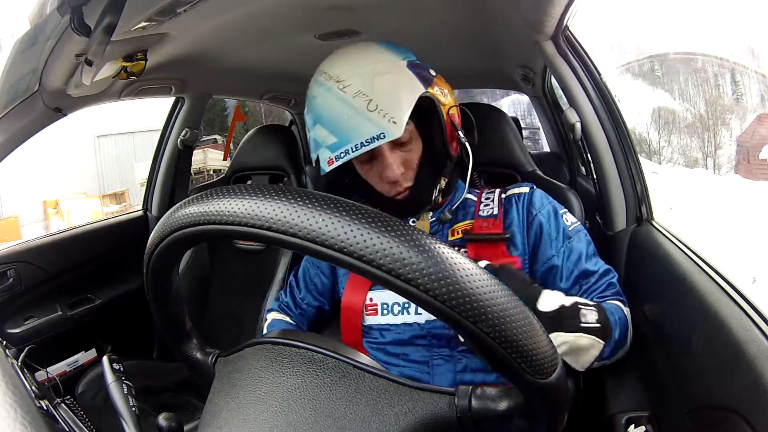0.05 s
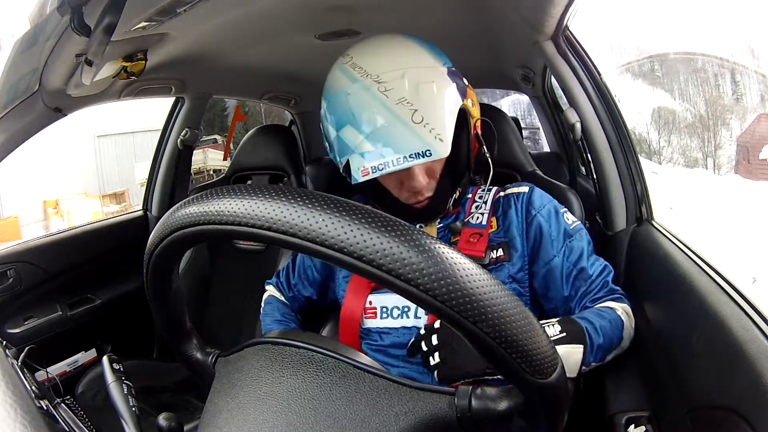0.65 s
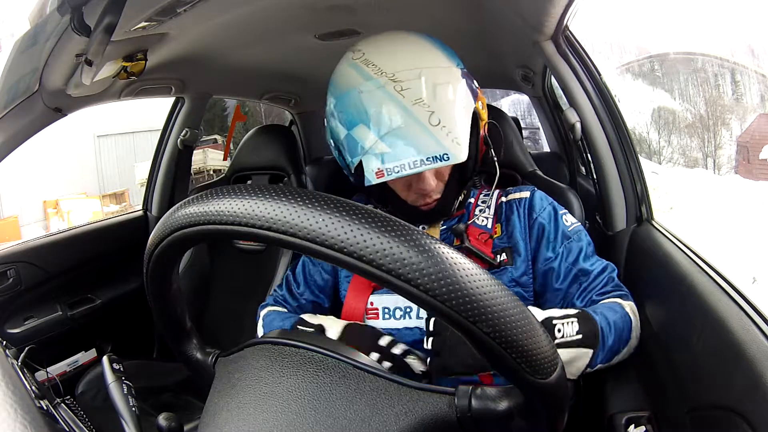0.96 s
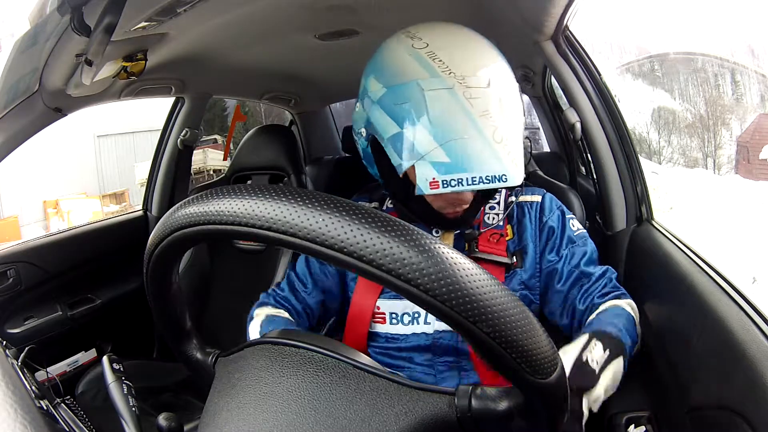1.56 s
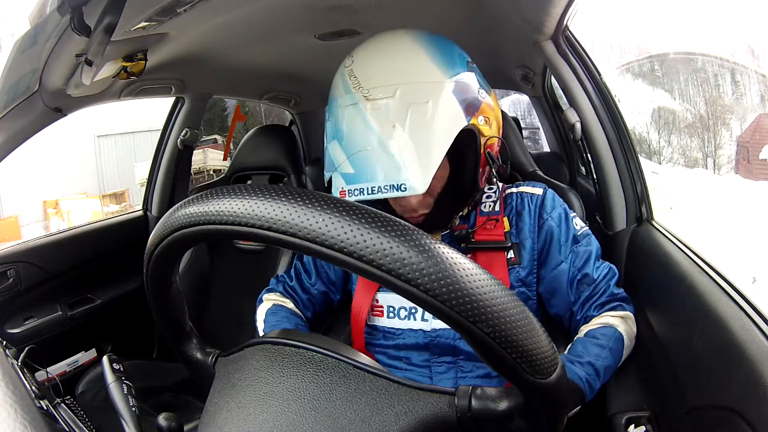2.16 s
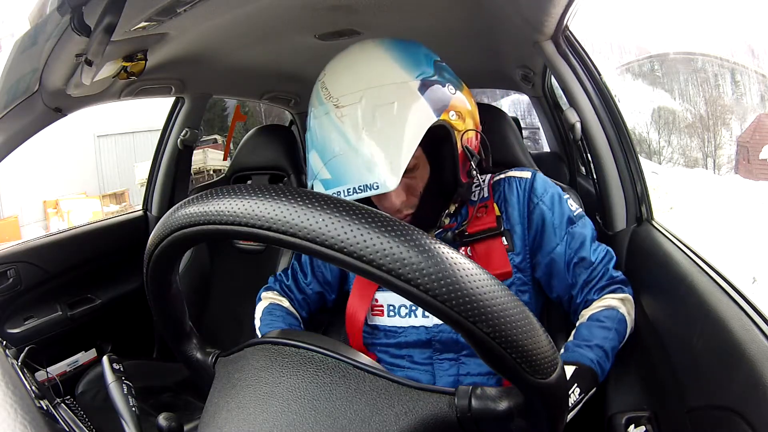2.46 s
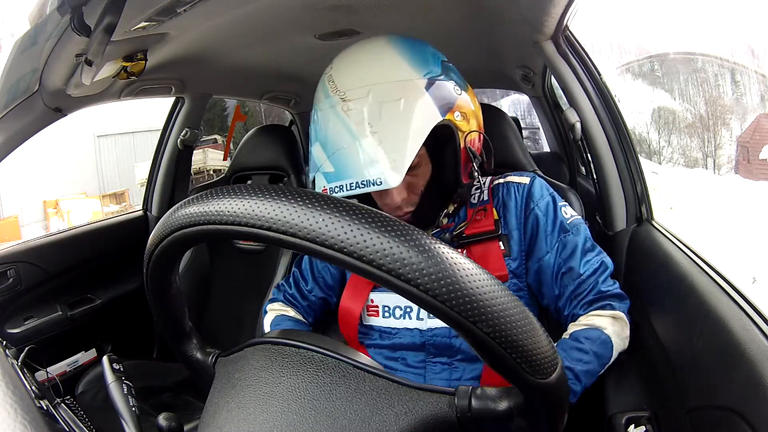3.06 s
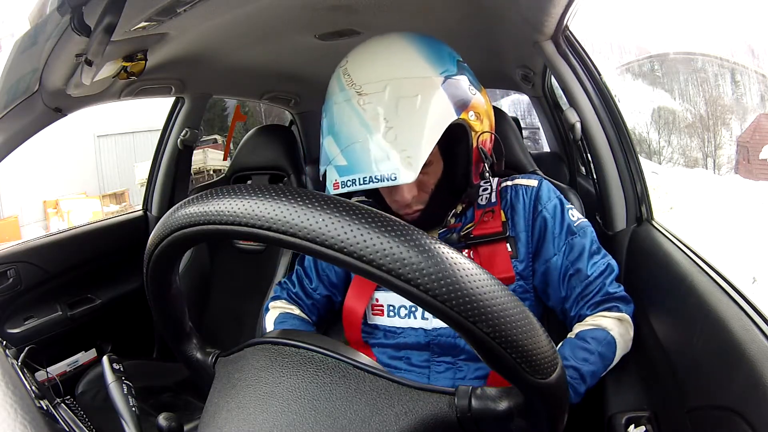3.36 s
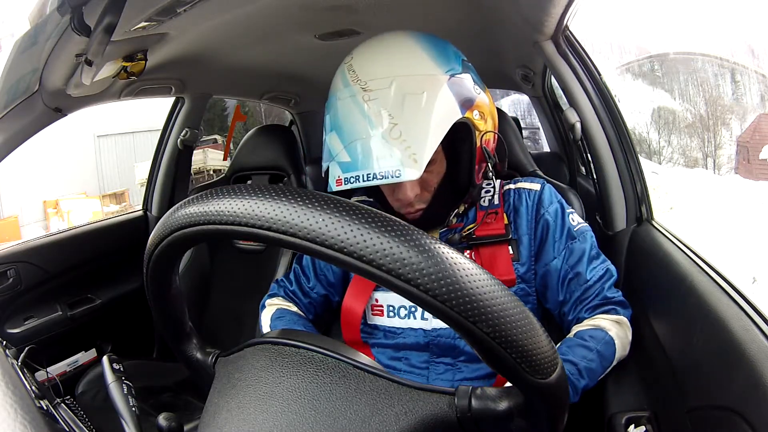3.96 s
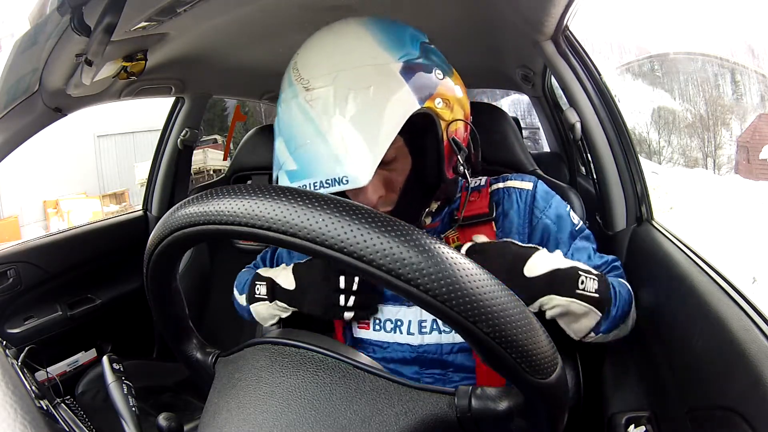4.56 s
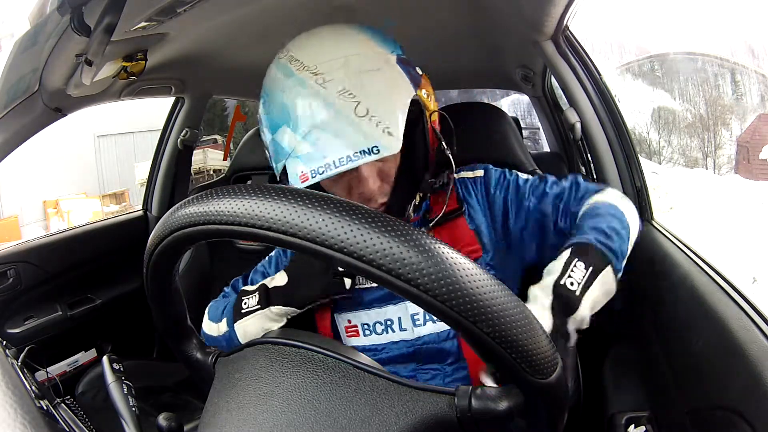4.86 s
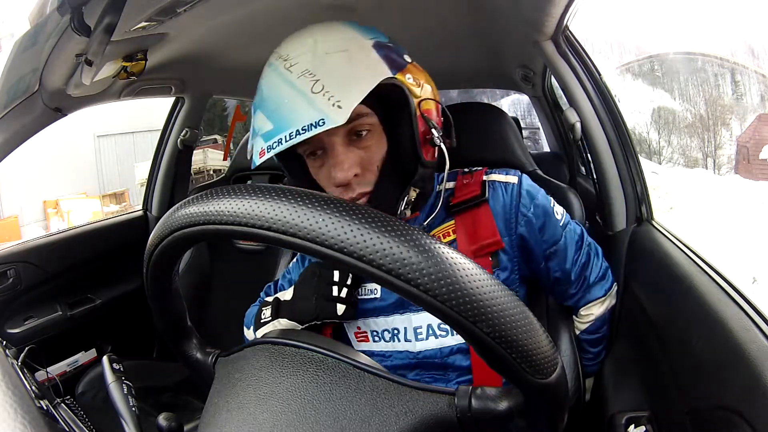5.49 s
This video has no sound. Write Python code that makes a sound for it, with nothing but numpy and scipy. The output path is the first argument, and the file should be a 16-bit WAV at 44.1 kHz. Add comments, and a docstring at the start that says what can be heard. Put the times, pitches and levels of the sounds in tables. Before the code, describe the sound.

A four-cylinder car engine idles steadily for the whole of nearly six seconds, heard inside the closed cabin as a low, pulsing boom with a soft mechanical wash and a very faint, thin, high whine. Close to the microphone, the driver's suit rustles in short swishes, and gloves and straps knock dully on the seat, around 0.2 to 0.5 seconds and again at 1.4 and 1.8. From about 1.4 seconds, metal harness tongues tick, jingle and scrape lightly at the buckle. The rustling eases after 3.3 seconds. A sharper metallic click comes at 3.9, and at 4.1 the buckle snaps home with the loudest click and a low clunk, followed by a few smaller ticks. The fabric rustles again from 4.3 to 5.4 seconds. At 5.1 an elbow hits the door with a hollow thump, then a softer bump, while the idle carries on.

```python
"""Inside the closed cabin of a four-cylinder rally car at idle, one microphone in with the driver.
Exhaust pulses make the cabin boom, the engine's wash comes through the bulkhead, and a thin electronic
whine sits on top. Close by, the driver's suit rustles as he gathers the harness, gloves and webbing
knock on the seat and an elbow bumps the door. In the foreground the harness's metal tongues tick and
scrape at the buckle, setting it ringing, and snap home with a low clunk of the latch."""
import sys
import numpy as np
from scipy import signal
from scipy.fft import rfft, irfft
from scipy.io import wavfile
from scipy.ndimage import uniform_filter1d

SR = 44100
rng = np.random.default_rng(int(sys.argv[2]) if len(sys.argv) > 2 else 0)


def log_audio(samples):
    """Write samples as a 16-bit WAV file to the path given in sys.argv[1]."""
    # one column per channel
    frames = np.atleast_2d(samples).T
    # limit to full scale, then quantise
    limited = np.clip(frames, -1, 1)
    pcm = np.round(limited * 32767).astype(np.int16)
    wavfile.write(sys.argv[1], SR, pcm)


N = 252674
TIME = np.arange(N) / SR


def from_db(db):
    """Decibels to gain."""
    return 10 ** (np.asarray(db) / 20)


def unit_rms(x):
    """Scale to an rms of 1."""
    return x / np.sqrt(np.mean(x ** 2) + 1e-20)


def curve(rows, t):
    """Join (time, value) rows by straight lines."""
    return np.interp(t, *np.transpose(rows))


def butter(x, hz, kind, order=2):
    """Butterworth filter."""
    return signal.sosfilt(signal.butter(order, hz, kind, fs=SR, output="sos"), x)


def drift(per_s):
    """A random wander of rms 1 that takes a new value per_s times a second."""
    points = np.c_[np.arange(4000) / per_s, rng.standard_normal(4000)]
    return unit_rms(curve(points, TIME))


def coloured(white, spectrum):
    """Shape white sound to (frequency, level) rows; rms 1."""
    hz, db = np.transpose(spectrum)
    bin_hz = np.maximum(np.arange(N // 2 + 1) * SR / N, 1)
    gain = from_db(np.interp(np.log(bin_hz), np.log(hz), db))
    return unit_rms(irfft(rfft(white) * gain, N))


def resonate(x, hz, width_hz):
    """One resonance with gain 1 at its peak."""
    radius = np.exp(-np.pi * width_hz / SR)
    feedback = [1, -2 * radius * np.cos(2 * np.pi * hz / SR), radius ** 2]
    return signal.lfilter(np.array([1, 0, -1]) * (1 - radius ** 2) / 2, feedback, x + 1e-18)


def struck(modes, scatter_db=0):
    """A body's ring after one sharp blow; scatter favours some modes, as the striking point does."""
    blow = signal.unit_impulse(SR // 4)
    return sum((-1) ** k * from_db(db + scatter_db * rng.standard_normal()) * resonate(blow, hz, width)
               for k, (hz, width, db) in enumerate(modes))


def through(x, ring):
    """Pass a sound through a body, keeping its energy."""
    rung = signal.oaconvolve(x, ring)[:len(x)]
    return rung * np.linalg.norm(x) / (np.linalg.norm(rung) + 1e-20)


def contact(decay_s, tail_db, tail_s):
    """A touch and its dense cabin reflections: a noise burst with a fainter tail."""
    t = TIME[:SR // 4]
    return rng.standard_normal(len(t)) * (np.exp(-t / decay_s) + from_db(tail_db) * np.exp(-t / tail_s))


def add(track, at_s, sound):
    """Mix a sound into the track, starting at at_s."""
    start = int(np.clip(at_s * SR, 0, N - 1))
    track[start:start + len(sound)] += sound[:N - start]


def whine(hz=10519, rms_db=-73.5):
    """Electronics, far in the background: one thin, steady tone."""
    return from_db(rms_db) * np.sqrt(2) * np.sin(2 * np.pi * hz * TIME)


# The engine's idle speed: (time [s], firing rate [Hz])
FIRING_RATE = [(0.0, 27.27), (0.7, 27.247), (1.35, 27.161), (1.6, 27.04), (2.3, 27.208), (3.2, 27.225),
               (3.85, 26.97), (4.15, 27.606), (4.4, 27.298), (4.6, 27.508), (5.3, 27.411), (5.73, 27.457)]
# Exhaust and cabin resonances: (frequency [Hz], width [Hz], level [dB])
BOOM_MODES = [(50.4, 8.0, -27.7), (65.0, 58.4, -30.6), (100.0, 81.8, -33.8), (181.3, 31.4, -40.9)]
def exhaust(uneven=0.037, limp=0.12, muffler_hz=243.4, leak_hz=41.8, nominal_hz=27.31, db_per_hz=2.3):
    """One pulse per firing booms in the cabin. Returns the boom and the firing phase in cycles."""
    rate = curve(FIRING_RATE, np.arange(-SR, N) / SR)  # a second's lead lets the boom build
    phase = np.cumsum(rate) / SR
    phase = phase - phase[SR] - .21  # the first firing falls .21 cycles in
    firings = np.flatnonzero(np.diff(np.floor(phase)))
    strong_weak = (-1.) ** np.arange(len(firings))
    boom = 0
    for k, (hz, width, db) in enumerate(BOOM_MODES):
        # the higher modes feel the cylinders' unevenness most
        scatter = (uneven * rng.standard_normal(len(firings)) + limp * strong_weak) * hz / muffler_hz
        pulses = np.zeros(len(rate))
        pulses[firings] = (1 + scatter) * SR / rate[firings]
        boom = boom + (-1) ** k * from_db(db) * resonate(pulses, hz, width)
    boom = butter(boom, muffler_hz, "low", order=8)
    boom = butter(boom, leak_hz, "high", order=4)  # the deepest swings leak out of the cabin
    swell = from_db(0.5 + db_per_hz * (rate - nominal_hz))  # louder when the idle runs fast
    return (boom * swell)[SR:], phase[SR:]


# Mechanical wash from beyond the bulkhead: (frequency [Hz], spectral level [dB])
WASH_SPECTRUM = [(20, 2), (30, 7.5), (100, 6.5), (190, 9), (270, -3), (430, -6.5), (520, -3), (800, -15.5),
                 (1400, -16.5), (2300, -18.5), (4000, -25.5), (7500, -32), (15000, -35)]
def idling_engine(wash_db=-45.5, panel_db=-62, throb=0.22):
    """The idle from inside: exhaust boom, steady wash, and a panel humming harder after each firing."""
    boom, phase = exhaust()
    wash = from_db(wash_db) * coloured(rng.standard_normal(N), WASH_SPECTRUM)
    shaking = rng.standard_normal(N) * (1 + throb * np.cos(2 * np.pi * (phase - .35)))
    panel = from_db(panel_db) * unit_rms(resonate(shaking, hz=522, width_hz=45))
    return boom + wash + panel


# The driver's arm movements: (time of greatest speed [s], swell time [s], level [dB])
ARM_MOVES = [(.02, 0.1, -51), (.33, 0.067, -57), (.49, 0.042, -50), (.78, 0.073, -56), (1.07, .025, -57.5),
             (1.42, 0.094, -65), (1.73, 0.034, -54), (1.87, 0.087, -53.5), (2.13, 0.058, -53),
             (2.33, 0.032, -56), (2.47, 0.025, -52), (2.62, 0.068, -60.5), (2.98, 0.077, -60),
             (3.475, 0.016, -49), (3.68, 0.027, -60), (4.05, 0.044, -53.5), (4.275, 0.041, -51),
             (4.42, 0.049, -55.5), (4.6, 0.074, -53), (4.79, 0.04, -51), (4.98, 0.16, -59.5),
             (5.22, 0.043, -47), (5.34, 0.072, -52), (5.72, 0.023, -61.5)]
def rubbing(fidget_db=-63, still_db=-71.5, still_from_s=3.3, still_until_s=4.0, release_ratio=1.22):
    """How hard the suit rubs: each arm movement swells and fades over a faint fidgeting."""
    # the fidgeting drops while the tongue seeks its slot
    still = uniform_filter1d(1. * ((TIME > still_from_s) & (TIME < still_until_s)), size=SR // 5)
    power = from_db(fidget_db + (still_db - fidget_db) * still) ** 2
    for at_s, swell_s, db in ARM_MOVES:
        width_s = swell_s * np.where(TIME < at_s, 1, release_ratio)  # arms slow down more gently
        power += from_db(db) ** 2 * np.exp(-((TIME - at_s) / width_s) ** 2)
    return np.sqrt(power)


# Suit fabric rubbing, close by: (frequency [Hz], spectral level [dB])
CLOTH_SPECTRUM = [(250, -3), (550, -5), (900, -7), (1450, -8), (1850, -2), (2350, -1), (3100, -7),
                  (4500, -12), (5800, -12.5), (7200, -24), (10000, -43), (15000, -51)]
def suit(level_db=1.5, patchy_db=1.82, snaps_per_s=260, crease_db=-7):
    """Fabric hisses as it slides, and small creases snap in it."""
    snaps = (rng.random(N) < snaps_per_s / SR) * rng.standard_normal(N)
    creases = unit_rms(through(snaps, contact(decay_s=0.0066, tail_db=-6, tail_s=0.028)))
    fibres = coloured(rng.standard_normal(N) + from_db(crease_db) * creases, CLOTH_SPECTRUM)
    return fibres * rubbing() * from_db(level_db + patchy_db * drift(per_s=45))


# Modes of the door beside the driver: (frequency [Hz], width [Hz], level [dB])
DOOR_MODES = [(106, 14, -0.5), (129, 8.4, 6.5), (190, 21, 0.5), (298, 58, -13), (393, 46, -11.5),
              (560, 40, -14), (774, 40, -16)]
# His elbow meeting the door: (time [s], level [dB])
ELBOW_BUMPS = [(5.088, -19), (5.226, -33.5)]
def elbow(cabin_db=-9):
    """A soft blow sets the door panel booming, and the cabin carries it on."""
    out = np.zeros(N)
    ring = butter(struck(DOOR_MODES), 910, "low")
    direct = ring / np.abs(ring).max()
    for at_s, db in ELBOW_BUMPS:
        cabin = through(contact(decay_s=0.054, tail_db=-19, tail_s=0.051), ring)
        add(out, at_s, from_db(db) * (direct + from_db(cabin_db) * cabin))
    return out


# Dull knocks: gloves and webbing on the seat, the latch's low clunk as it snaps home, and the elbow's thump on
# the door at 5.086 s: # (time [s], level [dB], pitch [Hz], relative rasp level [dB], decay time [s])
DULL_KNOCKS = [(.178, -30.5, 543, -9, 0.0051), (.287, -31, 1020, -6, 0.021), (.508, -28.5, 720, -2, 0.016),
               (1.418, -29, 1050, -6, 0.017), (1.802, -27, 530, -2.5, 0.009),
               (1.845, -33, 930, -0.5, 0.0092), (3.912, -27, 1240, -9, 0.016),
               (4.123, -20.5, 800, -16, 0.0096), (4.27, -34, 1310, -14, 0.011),
               (4.654, -33.5, 514, -10, 0.0072), (5.086, -23.5, 640, -5, 0.022)]
def knocks(thud_db=-7, rasp_db=-7):
    """Each knock sounds one broad, dull resonance with a rasp above it."""
    out = np.zeros(N)
    blow = signal.unit_impulse(SR // 16)
    rasp = butter(blow, [1700, 5600], "band", order=4)
    rasp = butter(rasp, 1400, "low", order=1)
    for at_s, db, hz, rasp_share_db, decay_s in DULL_KNOCKS:
        touch = from_db(db) * contact(decay_s, tail_db=-28.5, tail_s=0.061)
        thud = butter(resonate(blow, hz, width_hz=220), [380, 1400], "band")
        add(out, at_s, from_db(thud_db) * through(touch, thud))
        add(out, at_s, from_db(rasp_db + rasp_share_db) * through(touch, rasp))
    return out


# Modes of the buckle and its tongues: (frequency [Hz], width [Hz], level [dB])
BUCKLE_MODES = [(480, 68, -10), (677, 71, -1.5), (923, 34, -7.5), (1020, 40, -8.5), (1175, 43, -8),
                (1320, 19, -2), (1747, 115, 1.5), (2153, 78, 1.5), (2278, 51, 2.5), (2514, 35, -2.5),
                (2724, 91, -7), (3285, 73, -3.5), (3475, 55, -11), (3830, 120, -8.5), (4170, 45, -14),
                (5270, 150, -9), (5910, 450, -15.5), (6680, 170, -17), (7430, 320, -26.5)]
def buckle_ring(scatter_db=0):
    """The harness metal ringing after one sharp blow."""
    return struck(BUCKLE_MODES, scatter_db)


# Webbing and tongues sliding through the fittings:
# (time at the middle [s], half length [s], level [dB], pitch [Hz])
HARNESS_SLIDES = [(0.478, 0.026, -44.5, 610), (0.528, 0.015, -39, 640), (2.18, 0.028, -53.5, 1900),
                  (2.62, 0.0094, -49.5, 1770), (2.991, 0.0059, -47.5, 1770), (3.059, 0.019, -47, 1740),
                  (3.158, 0.012, -46, 1730), (3.48, 0.023, -49, 1980), (3.681, 0.012, -43.5, 1760),
                  (4.0619, 0.0049, -25, 1800), (4.264, 0.0086, -43, 1980)]
def scrapes(level_db=-1.0, rough_db=3.0, metal_db=-8):
    """Friction catches and slips, sounding one broad resonance and, faintly, the buckle's modes."""
    out = np.zeros(N)
    t = TIME[:SR // 4]
    middle_s = t[-1] / 2
    metal = butter(buckle_ring(), [1300, 6000], "band")
    for at_s, half_s, db, hz in HARNESS_SLIDES:
        grip = from_db(rough_db * drift(per_s=348.6)[:len(t)])
        swell = np.exp(-((t - middle_s) / half_s) ** 2 / 2)
        friction = from_db(db + level_db) * grip * swell * rng.standard_normal(len(t))
        tone = resonate(signal.unit_impulse(len(t)), hz, width_hz=300)
        tone = butter(tone, [hz / 2, hz * 2], "band")
        add(out, at_s - middle_s, through(friction, tone) + from_db(metal_db) * through(friction, metal))
    return out


def jingles(start_s=2.5, end_s=4.1, per_s=4.5, level_db=-43.5, spread_db=3.5, hollow_db=-13,
            bright_db=-15):
    """Loose tongues touch faintly at random as he gathers them; rows as in TONGUE_CLICKS."""
    span_s = end_s - start_s
    draws = rng.random((int(per_s * span_s), 2))
    return [(start_s + when * span_s, level_db + spread_db * (2 * force - 1), hollow_db, bright_db)
            for when, force in draws]


# Tongues meeting the buckle, in the foreground:
# (time [s], level [dB], relative hollow body level [dB], relative bright edge level [dB])
TONGUE_CLICKS = [(0.2006, -45, 10, -30), (0.8704, -42, 1, -8.5), (1.4057, -37, -1, -11),
                 (1.4522, -39, -12, -25), (1.484, -43, 7, -27), (1.735, -34, -5, -18),
                 (1.786, -33, -19, -17), (1.802, -24, -31, -21.5), (1.8376, -34, -9, -12),
                 (2.1113, -35, -3, -16), (2.187, -32.5, -11, -17), (2.276, -36.5, -3, -21),
                 (2.3625, -36.5, 5.5, -18), (2.8768, -37, -13, -18), (3.03, -38, -1, -28),
                 (3.053, -38, -3, -28), (3.1236, -35, -4, -9), (3.1485, -35, -8, -13),
                 (3.339, -39.5, -3, -16), (3.3834, -37.5, 0.5, -17), (3.6068, -37.5, -16, -11.5),
                 (3.911, -19.5, -14.5, -12), (3.9301, -22.5, -4.5, -11.5), (4.0373, -27.5, -3.5, -30),
                 (4.0554, -32, -6, -34), (4.0625, -21, -16, -13.5), (4.1216, -8, -7.5, -15.5),
                 (4.1335, -23.5, -8, -10), (4.1617, -28, -1.5, -20), (4.26, -28, -15, -13.5),
                 (4.3222, -34, -4, -14)]
def buckle(housing_db=-8.0, plates_db=-6.0, edge_db=-3.5, crack_db=-16, soft_hz=6000, hard_hz=8000):
    """Each touch shares its force between the hollow housing, the ringing plates and their edges."""
    out = np.zeros(N)
    crack = from_db(crack_db) * butter(signal.unit_impulse(SR // 4), 1800, "low", order=1)
    hardest_db = max(row[1] for row in TONGUE_CLICKS)
    for at_s, db, hollow_db, bright_db in TONGUE_CLICKS + jingles():
        # a harder touch is shorter, so it reaches higher
        top_hz = np.interp(db, [-22, -10], [soft_hz, hard_hz])
        ring = butter(buckle_ring(scatter_db=2.5) + crack, top_hz, "low")
        touch = from_db(db) * contact(decay_s=0.0055, tail_db=-24, tail_s=0.032)
        housing = from_db(hollow_db + housing_db) * through(touch, butter(ring, [480, 1400], "band", 3))
        plates = from_db(plates_db) * through(touch, butter(ring, [1560, 4300], "band", 3))
        edges = from_db(bright_db + edge_db) * through(touch, butter(ring, 4600, "high", 4))
        # a steely snap above the modes stands out only on the hardest touches
        snap_db = bright_db - 15 + 0.54 * (db - hardest_db)
        snap = from_db(snap_db) * butter(touch, 11000, "high", order=4)
        add(out, at_s, housing + plates + edges + snap)
    return out


def scene():
    """Everything in the cabin, at one microphone."""
    return (whine() + idling_engine() + suit() + buckle() + scrapes() + knocks() + elbow())[None]


def record(dry, cutoff_hz=15400):
    """The microphone's signal, with the top treble cut steeply."""
    return signal.sosfilt(signal.ellip(10, .1, 90, cutoff_hz, fs=SR, output="sos"), dry)


dry = scene()
out = record(dry)
log_audio(out)
```